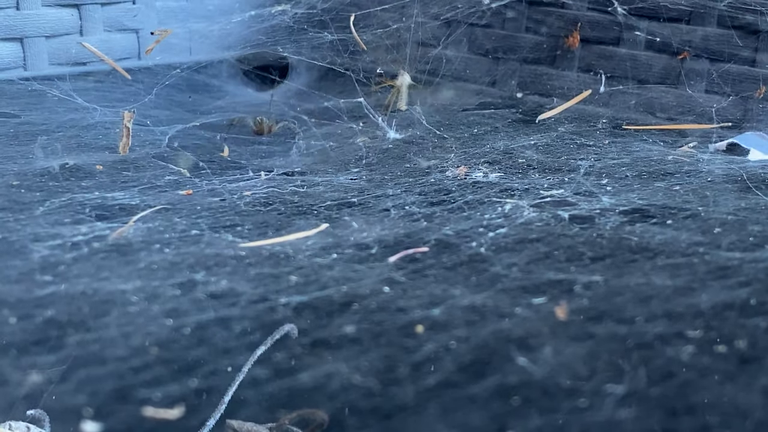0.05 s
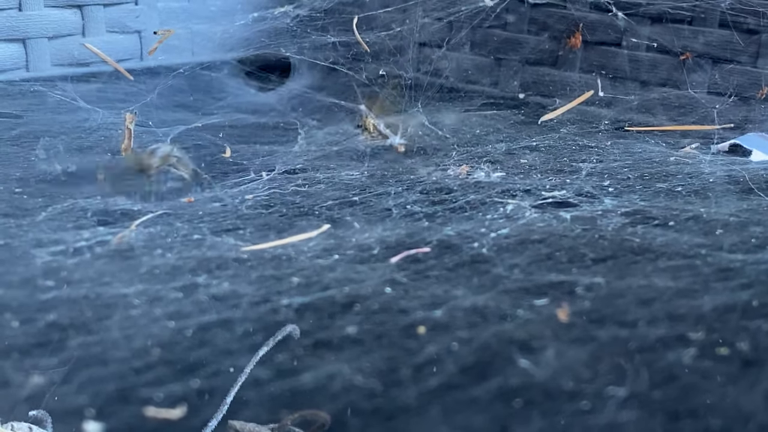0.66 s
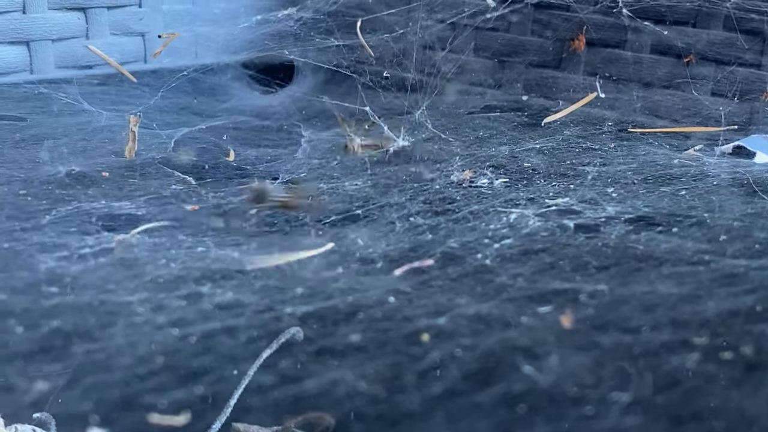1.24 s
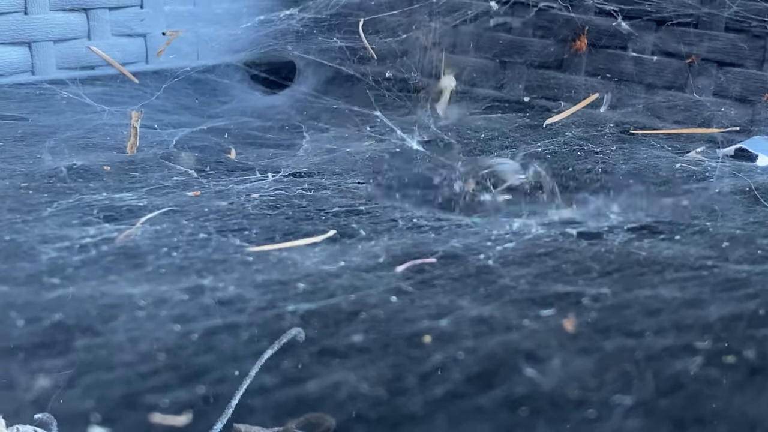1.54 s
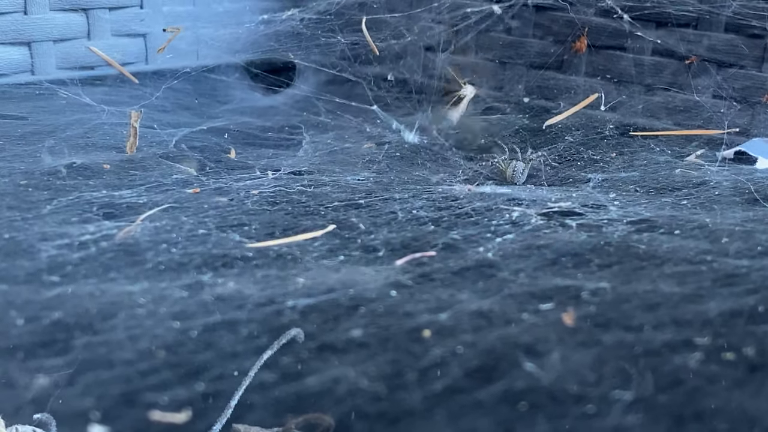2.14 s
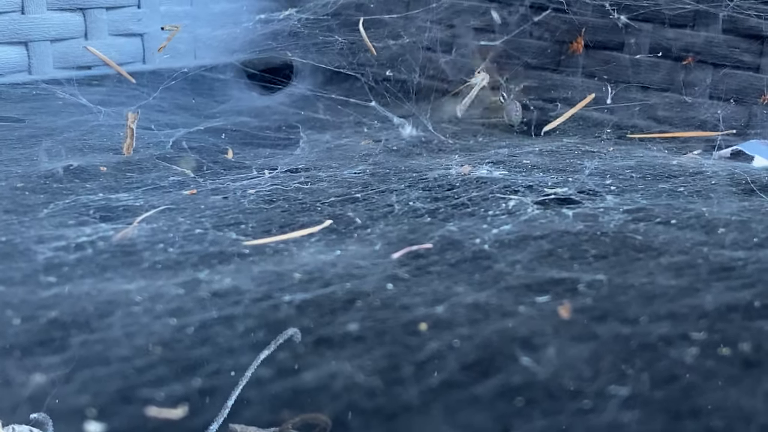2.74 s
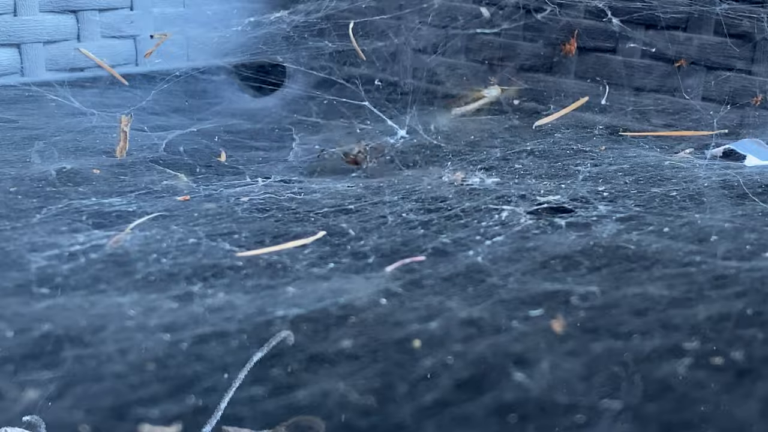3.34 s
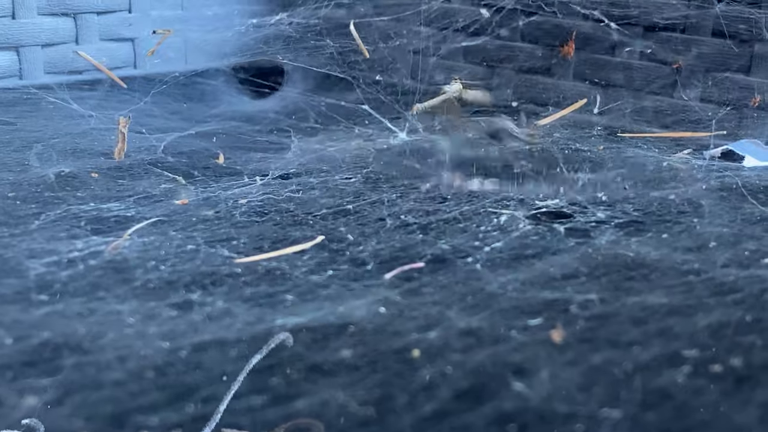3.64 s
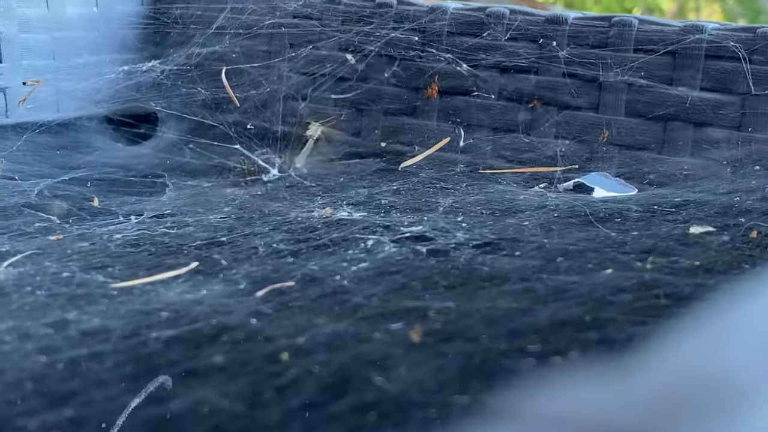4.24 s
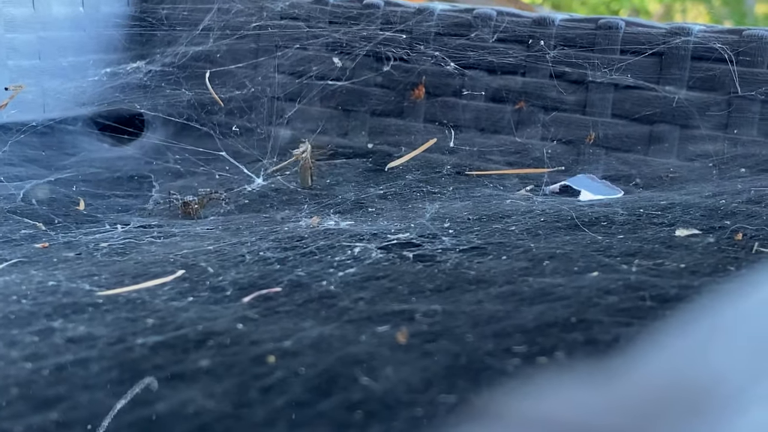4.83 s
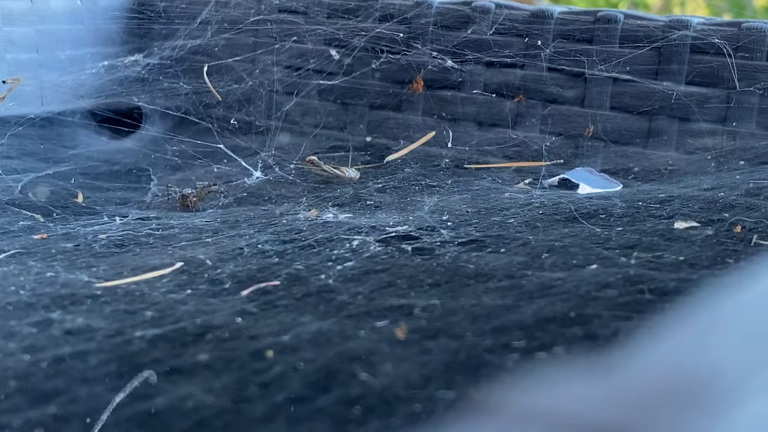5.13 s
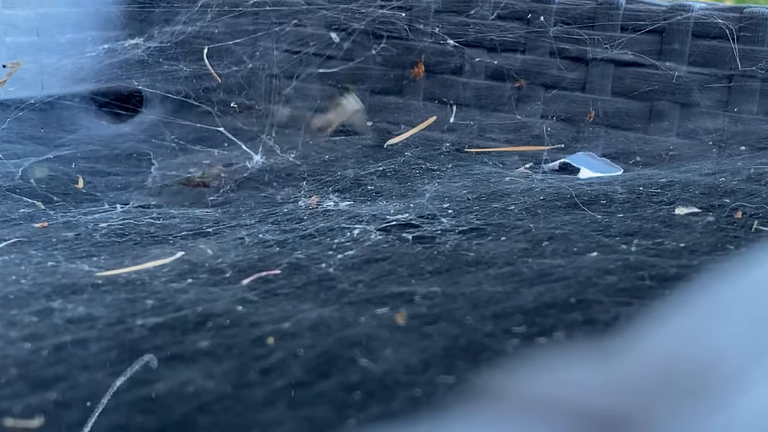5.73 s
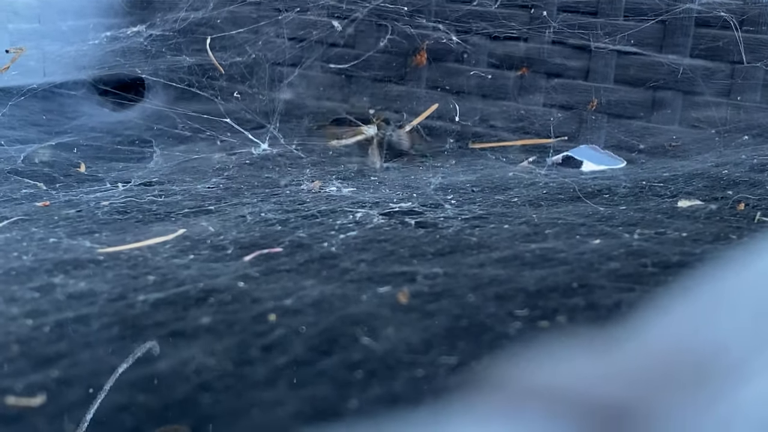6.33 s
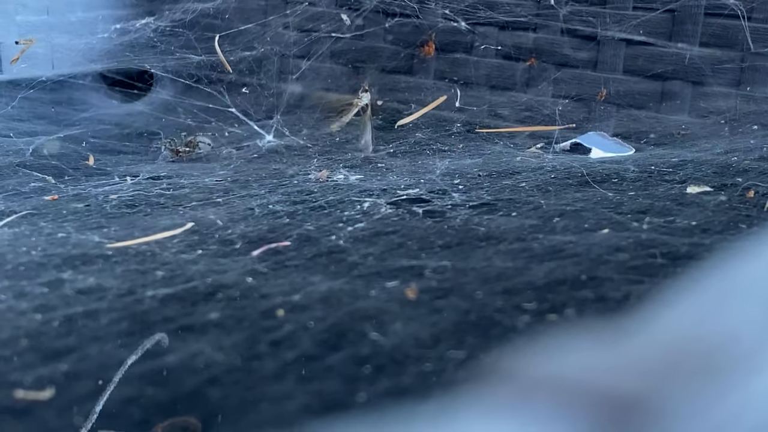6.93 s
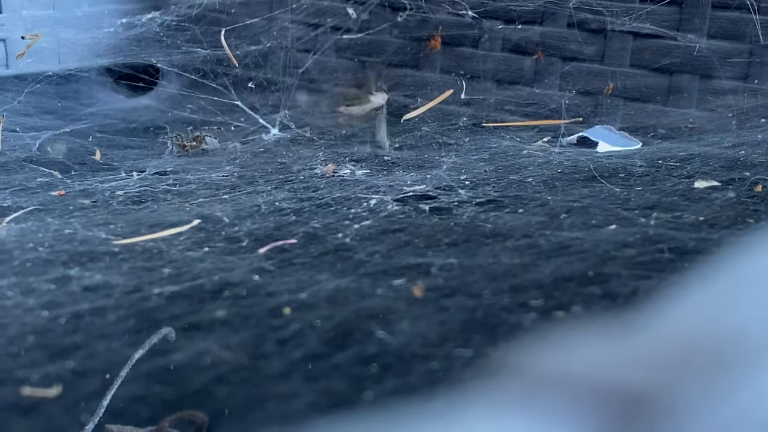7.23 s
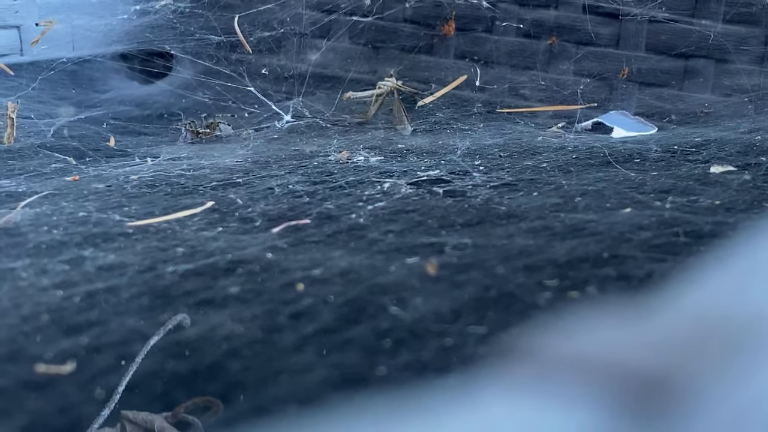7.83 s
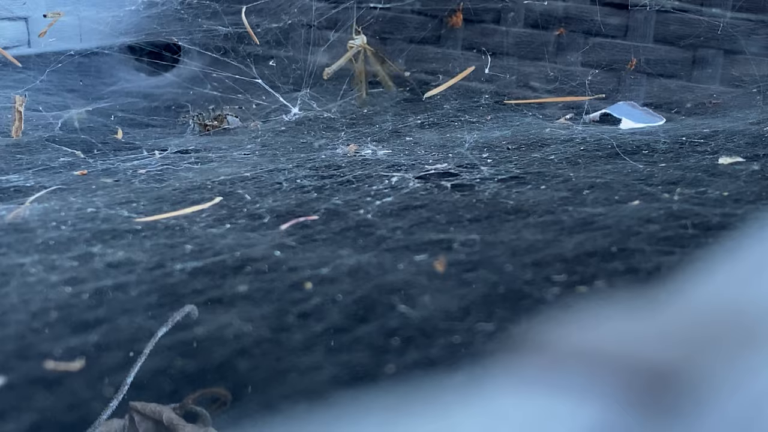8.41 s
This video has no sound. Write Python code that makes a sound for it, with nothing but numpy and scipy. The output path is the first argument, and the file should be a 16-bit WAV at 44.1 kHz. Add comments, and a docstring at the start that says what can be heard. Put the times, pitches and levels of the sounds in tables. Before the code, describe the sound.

A bird scolds outdoors, slightly to the left, in a quick run of harsh, raspy chirps. Distant traffic rumbles and a machine hums low while, close to the microphone, an insect's wings tick and flutter faintly against a spider's web. Midway a hand bumps the microphone with a scuff, a sharp knock and a brief low boom. The bird scolds again, farther off, then only the rumble and ticking remain.

```python
"""A bird scolds in harsh, quick calls, each a chirp that breaks into a two-voiced rasp.
Behind it, distant traffic roars and a machine hums low. Close by, an insect struggles in a
spider's web on a wicker seat, its wings ticking on the silk. Midway a hand jolts a camera:
a scuff, a sharp knock and a short boom from the seat. The bird then scolds again, farther off."""
import sys
import numpy as np
from scipy import signal
from scipy.fft import rfft, irfft
from scipy.io import wavfile
from scipy.ndimage import uniform_filter1d

SR = 44100
rng = np.random.default_rng(int(sys.argv[2]) if len(sys.argv) > 2 else 0)


def wrap_up_sound(samples):
    """Save the sound to the file named by the first command line argument, as 16-bit audio."""
    columns = np.atleast_2d(samples).T
    # keep every value between -1 and 1, then stretch to whole-number steps
    tamed = np.clip(columns, -1, 1)
    steps = np.round(tamed * 32767).astype(np.int16)
    wavfile.write(sys.argv[1], SR, steps)


N = 373527
TIME = np.arange(N) / SR
FREQUENCIES = np.fft.rfftfreq(N, 1 / SR)

# how alike surrounding noise is left and right (frequency [Hz], likeness [0 to 1])
STEREO_LIKENESS = [(60, .985), (150, .975), (300, .91), (550, .55), (1100, .37), (2200, .57), (3300, .92),
                   (4500, .99), (7000, .99), (12000, .85)]
# how far the left side runs ahead; scene() eases it out below 2 kHz (frequency [Hz], phase [radians])
LEFT_LEAD = [(100, -1.5), (2000, 0), (3400, -0.1), (6000, 1.27), (6700, 0.5), (7300, 0.85), (8400, 3.5),
             (9800, 3), (11100, 7.5), (13200, 5.5), (14400, 10), (15500, 9)]
# tone of the far traffic (frequency [Hz], relative level [dB])
TRAFFIC_SPECTRUM = [(25, -8), (45, 14), (78, 12.5), (110, 7), (150, -3), (220, -4.5), (420, -9.5),
                    (560, -5), (760, -5.5), (1020, 0.5), (1350, -6.5), (2000, -11), (3400, -26),
                    (5400, -38), (15000, -54)]
# loudness of the far traffic around 1 kHz (time [s], level [dB])
TRAFFIC_LEVEL = [(0, -59), (1, -58.5), (2.5, -59.5), (3.5, -60.5), (4.5, -59.5), (5.6, -60.5), (7, -60.2),
                 (8.47, -59.5)]
# tone of one nearer vehicle (frequency [Hz], relative level [dB])
VEHICLE_SPECTRUM = [(40, -16), (90, 3.5), (170, 0), (260, -8.5), (550, -14.5), (800, -12), (1200, -10),
                    (2000, -19), (4000, -30), (8000, -51)]
# that vehicle draws away (time [s], level [dB])
VEHICLE_LEVEL = [(0, -51), (.5, -53.5), (.9, -50), (1.75, -52), (2.3, -54.5), (3.1, -57.5), (3.7, -58),
                 (4.5, -63.5), (5.3, -72), (8.47, -74)]
# slow rise and fall of the machine hum (time [s], level [dB])
HUM_LEVEL = [(0, -47.5), (.9, -49), (1.08, -55), (1.58, -42.5), (1.72, -61), (1.98, -46.5), (2.6, -49),
             (3.15, -63), (3.7, -49), (4.4, -45.5), (5.4, -50.5), (6.85, -51.5), (7.15, -46.5),
             (7.4, -52.5), (8.47, -53)]
# spells of fluttering (start [s], length [s], level [dB])
FLUTTER_BOUTS = [(0, 1, -78.5), (1.14, .16, -76.5), (1.41, 0.31, -77.5), (1.9, .11, -85), (2.15, 0.44, -79),
                 (2.66, 0.19, -80), (2.908, 0.67, -74), (3.62, .46, -75.5), (4.17, .2, -78),
                 (4.378, 0.42, -71), (5.732, .09, -76.5), (6.14, .05, -85), (6.34, .12, -84),
                 (6.487, 0.38, -81.5), (7.02, .09, -73), (7.212, 0.097, -72.5), (7.35, 0.2, -76.5),
                 (7.77, .03, -85.5), (8.34, .08, -86)]
# the wings hit the web hard (time [s], level [dB])
WING_HITS = [(.8759, -54), (.938, -55), (1.2516, -52.5), (1.4601, -53.5), (1.9784, -59), (2.3255, -54.5),
             (2.355, -48.5), (2.5186, -59), (2.7327, -56), (2.913, -54), (3.54, -51), (3.7526, -51),
             (4.4164, -55.5), (4.589, -54), (4.66, -52), (5.7414, -62), (6.554, -62), (7.0559, -49),
             (7.085, -55), (7.2634, -53.5), (7.5138, -58.5)]
# tone of a wing on silk (frequency [Hz], gain [dB])
SILK_TONE = [(1500, -21), (3500, -1.5), (7000, -1.5), (9000, 2.5), (12500, 0), (14500, 3), (15600, -11)]
# tone of the hand rubbing the camera (frequency [Hz], relative level [dB])
SCUFF_SPECTRUM = [(25, -22), (55, -4.5), (105, 1), (190, -8), (290, 2), (430, -7.5), (600, -11),
                  (760, -7.5), (1100, -15), (2000, -24.5), (5000, -37.5), (11000, -32.5), (15500, -43)]
# loudness of that rub (time [s], level [dB])
SCUFF_LEVEL = [(3.7, -85), (3.755, -49), (3.78, -45), (3.796, -37.5), (3.804, -29.5), (3.82, -31.5),
               (3.834, -29.5), (3.845, -37), (3.862, -49), (3.92, -81)]
# knocks on the camera's case (time [s], relative level [dB])
KNOCKS = [(3.7865, -47), (3.8178, -36), (3.8297, -28), (3.8338, -18.5), (3.8443, -37.5), (3.851, -37.5)]
# notes the case rings with (frequency [Hz], relative level [dB], time to fade by 60 dB [s])
CASE_NOTES = [(290, -16, .06), (740, -9.5, 0.028), (1150, -19, 0.023), (2400, -4, 0.016),
              (3140, -5.5, 0.011), (4140, -8, 0.014), (7230, -17, .01), (10800, -15, 0.0078)]
# notes the seat booms with (frequency [Hz], level [dB], time to fade by 60 dB [s])
SEAT_NOTES = [(62.4, -25, .44), (82, -26.5, .31), (115.4, -29, 0.23)]
# first echoes off the ground and a wall (delay [s], gain [dB])
NEAR_ECHOES = [(.0041, -12), (0.0114, -15.5), (.047, -17.5)]
# how long the yard echoes (frequency [Hz], time to fade by 60 dB [s])
YARD_FADE = [(1000, 0.69), (3000, 0.52), (4500, .56), (7000, 0.46), (12000, 0.25)]
# share of the bird's sound that the yard sends back (time [s], gain [dB])
ECHO_SHARE = [(0, -6), (.9, -7.5), (3.9, -4), (5.2, -3)]
# the bird's calls, with levels before filtering and echoes
# (time [s], chirp level [dB], chirp pitch [Hz], delay to mid-rasp [s], rasp level [dB], hiss level [dB])
BIRD_CALLS = [ (-.07, -40, 2020, .028, -45.5, -46.5), (.084, -48, 2000, .03, -43, -41.5),
              (.247, -45.5, 2040, .022, -44.5, -45.5), (.397, -45.5, 1990, .021, -44.5, -46),
              (.545, -44, 2000, .026, -43.5, -45.5), (.697, -46, 2000, .03, -44.5, -44.5),
              (3.815, -51, 2070, 0.028, -52, -46.5), (3.972, -49.5, 2070, .032, -50, -53),
              (4.128, -48.5, 2120, 0.032, -50, -54.5), (4.277, -49.5, 2006, .031, -47.5, -51),
              (4.427, -45, 2100, 0.028, -47.5, -51.5), (4.587, -48.5, 1975, 0.025, -48.5, -50),
              (4.744, -47, 2060, .024, -48.5, -51), (4.895, -49.5, 1990, .021, -48, -52)]
# how the throat shapes the rasp (frequency [Hz], gain [dB])
THROAT_TONE = [(1000, -21), (1700, -1), (2150, 3), (2520, -4.5), (2850, 1), (3450, -2), (3750, -5),
               (4300, -10), (7000, -23)]
# tone of the breathy hiss above the rasp (frequency [Hz], gain [dB])
HISS_TONE = [(2500, -13), (3700, -2), (4500, 1.5), (4950, -2), (5400, 0.5), (6000, -4), (6900, -4),
             (7700, -7), (9500, -25), (13000, -27), (15500, -40)]
# how much louder the bird is on the left (frequency [Hz], left minus right [dB])
BIRD_BALANCE = [(1000, -1.5), (2100, 8), (3000, 4), (4400, -0.5), (8000, 0.5)]


def gain_of(db):
    """Turns decibels into a number to multiply by."""
    return 10 ** (np.asarray(db) / 20)


def evened(x):
    """Scales a signal to an average strength (rms) of 1."""
    return x / np.sqrt(np.mean(x ** 2) + 1e-20)


def by_frequency(table, hz=FREQUENCIES):
    """Reads between a table's rows on a log-frequency scale."""
    row_hz, value = np.transpose(table)
    return np.interp(np.log(hz + 1), np.log(row_hz + 1), value)


def over_time(table):
    """Reads between a table's rows at every sample."""
    return np.interp(TIME, *np.transpose(table))


def filtered(x, response):
    """Multiplies each frequency in x by its own factor."""
    return irfft(rfft(x) * response, N)


def shaped(x, tone):
    """Filters x with a table of decibels."""
    return filtered(x, gain_of(by_frequency(tone)))


def drift(rate_hz):
    """A smooth random wobble of strength 1."""
    return evened(filtered(rng.standard_normal(N), np.exp(-(FREQUENCIES / rate_hz) ** 2)))


def add(mix, start_s, sound):
    """Lays a sound into the mix."""
    part = mix[max(round(start_s * SR), 0):][:len(sound)]
    part += sound[:len(part)]


def resonate(x, hz, width_hz):
    """Makes x ring at a moving pitch."""
    turn = np.exp(2j * np.pi * np.cumsum(hz) / SR)
    feedback = np.exp(-np.pi * width_hz / SR)
    return 2 * (turn * signal.lfilter([1 - feedback], [1, -feedback], x / turn)).real


def surrounding_noise(spectrum):
    """Noise from all around: left and right differ most in the middle pitches."""
    common, apart = rng.standard_normal((2, N))
    likeness = np.clip(by_frequency(STEREO_LIKENESS), 0, .999)
    side = filtered(apart, np.sqrt((1 - likeness) / (1 + likeness)))
    return evened(shaped(np.array([common + side, common - side]), spectrum))


def far_traffic():
    """Distant tyres blend into a steady roar."""
    roar = surrounding_noise(TRAFFIC_SPECTRUM)
    tyre_band = filtered(roar.mean(0), (FREQUENCIES > 850) & (FREQUENCIES < 1300))
    return roar / np.std(tyre_band) * gain_of(over_time(TRAFFIC_LEVEL) + .5 * drift(16))


def passing_vehicle(drone_hz=543, width_hz=144, peak_s=1.79, swell_s=.36, swell_db=12):
    """A nearer vehicle: its drone swells once as it goes by, then it fades away."""
    rumble = surrounding_noise(VEHICLE_SPECTRUM)
    drone = filtered(rumble, np.exp(-((FREQUENCIES - drone_hz) / width_hz) ** 2))
    swell = np.exp(-((TIME - peak_s) / swell_s) ** 2)
    rumble += drone * (gain_of(swell_db * swell) - 1)
    return rumble * gain_of(over_time(VEHICLE_LEVEL) + 1.3 * drift(15))


def machine_hum(pitch_hz=60.65, wander_hz=1.995, throb_hz=9):
    """A distant machine wavers and throbs, with a faint tone near three times its pitch."""
    phase = 2 * np.pi * np.cumsum(pitch_hz + wander_hz * drift(9.03)) / SR
    throb = 1 + .39 * (drift(throb_hz) + 1j * drift(throb_hz))
    drone = evened((throb * np.exp(1j * phase)).real) * gain_of(over_time(HUM_LEVEL))
    overtone = gain_of(-70.5) * np.sin(2 * np.pi * np.cumsum(179 + 1.526 * drift(3.05)) / SR)
    return (drone + overtone) * gain_of([[-.5], [.5]])  # a little to the right


def wing_effort(fade_s=.02, waver_hz=7):
    """How hard the insect beats its wings: each bout rises, wavers and dies away."""
    level = np.zeros(N)
    for start, length, db in FLUTTER_BOUTS:
        outside_s = np.maximum(start - TIME, TIME - start - length)
        level = np.maximum(level, gain_of(db) * np.exp(-np.clip(outside_s / fade_s, 0, 20)))
    return level * gain_of(drift(waver_hz))


def insect_wings(beat_hz=72):
    """Each wingbeat ticks on the silk: a faint flutter, and three fading ticks for a hard hit."""
    beat_count = np.cumsum(beat_hz * (1 + .073 * drift(7.2))) / SR
    strength = gain_of(3.2 * np.minimum(rng.standard_normal(N), 2))[beat_count.astype(int)]  # one a beat
    flutter = evened(.4 + strength * np.exp(-(beat_count % 1) / .12)) * wing_effort()
    t = np.arange(SR // 60) / SR
    tick = np.exp(-t / .00072) + .2 * np.exp(-t / .0064)
    hits = np.zeros(N)
    for start, db in WING_HITS:
        for beat, chance in enumerate(rng.standard_normal(3)):
            tick_s = start + beat / beat_hz * (1 + .045 * chance)
            add(hits, tick_s, gain_of(db - 5.5 * beat + 1.6 * chance) * tick)
    return shaped(np.hypot(flutter, hits) * rng.standard_normal(N), SILK_TONE)


def hand_scuff():
    """A hand rubs the camera, making a short burst of rough noise."""
    rub = evened(surrounding_noise(SCUFF_SPECTRUM) * gain_of(2.3 * drift(200)))
    touching = (TIME > SCUFF_LEVEL[0][0]) & (TIME < SCUFF_LEVEL[-1][0])
    return rub * gain_of(over_time(SCUFF_LEVEL)) * touching


def case_knocks():
    """Each knock gives a sharp crack and sets the camera's case ringing."""
    t = np.arange(SR // 3) / SR
    knocks = np.zeros((2, N))
    for start, db in KNOCKS:
        ring = sum(gain_of(level - 60 * t / fade_s) * np.sin(2 * np.pi * (hz * t + rng.random()))
                   for hz, level, fade_s in CASE_NOTES)
        for side in knocks:
            crack = rng.standard_normal(len(t)) * (np.exp(-t / .0007) + .11 * np.exp(-t / .0086))
            add(side, start, gain_of(db) * (gain_of(-4.5) * ring + gain_of(-7.5) * crack))
    return knocks


def seat_boom(start_s=3.825, rise_s=.021):
    """The jolt makes the seat ring briefly with three deep notes."""
    t = np.arange(SR // 3) / SR
    ring = sum(gain_of(db - 60 * t / fade_s) * np.sin(2 * np.pi * hz * t) for hz, db, fade_s in SEAT_NOTES)
    boom = np.zeros(N)
    add(boom, start_s, ring * (1 - np.exp(-t / rise_s)))
    return boom


def yard_echo(x, echoes_per_s=2500, build_s=.0063):
    """Walls and trees scatter many small echoes; the highest pitches die first."""
    echoes = rng.standard_normal((2, SR)) * (rng.random((2, SR)) < echoes_per_s / SR)
    echoes[1] = .91 * echoes[0] + .5 * echoes[1]  # the right side is much like the left
    hz, t, bands = signal.stft(echoes, SR, nperseg=256)
    build_up = 1 - np.exp(-t / build_s)
    fade = gain_of(-60 * t / by_frequency(YARD_FADE, hz)[:, None])
    tail = signal.istft(bands * build_up * fade, SR, nperseg=256)[1]
    return signal.fftconvolve(x[None], tail / np.linalg.norm(tail[0]), axes=1)[:, :N]


def bird_chirp(t, pitch_hz, shudder, air):
    """A breathy whistle that arches up and down in pitch, loudest at t = 0."""
    arch_hz = pitch_hz * np.maximum(1.01 - .0597 * (t / .01305) ** 2, .87) * (1 + .046 * shudder)
    swell = np.exp(-(t / .0088) ** 2) + .32 * np.exp(-((t - .024) / .016) ** 2)
    whistle = np.sin(2 * np.pi * np.cumsum(arch_hz) / SR) * swell
    breath = evened(resonate(air, arch_hz, 350)) * np.exp(-((t - .004) / .018) ** 2)
    return whistle + .264 * breath


def bird_call(chirp_db, chirp_hz, delay_s, rasp_db, hiss_db, lead_s):
    """One call in three parts: a chirp, a rasp that climbs as the beak opens, and a hiss on top."""
    t = np.arange(SR // 6) / SR - lead_s
    puffs, air, *shakes = rng.standard_normal((5, len(t)))
    low_shake, high_shake, shudder = (evened(uniform_filter1d(shake, 50)) for shake in shakes)
    chirp = bird_chirp(t, chirp_hz, shudder, air)
    opening = np.clip(t / (2 * delay_s), 0, 1)
    roughness = np.clip(.2 + 1.22 * opening, 0, .75)
    # the two sides of the bird's voice box sound at their own unsteady pitches
    low_climb_hz, high_climb_hz = 450 * rng.uniform(.599, 1.4, 2)
    low_hz = (2800 + low_climb_hz * opening) * (1 + .06 * roughness * low_shake)
    high_hz = (3220 + high_climb_hz * opening) * (1 + .048 * roughness * high_shake)
    low_phase, high_phase = 2 * np.pi * np.cumsum([low_hz, high_hz], axis=1) / SR
    high_entry = np.clip(opening * 2.9, 0, 1)
    voices = evened(np.sin(low_phase) + 1.24 * high_entry * np.sin(high_phase))
    centre_hz = (low_hz + high_entry * high_hz) / (1 + high_entry)
    rasp = evened(voices + 1.4 * roughness * evened(resonate(puffs, centre_hz, 900)))
    rasp *= np.exp(-np.abs((t - delay_s) / .025) ** 3)
    # each voice is 3 times a pitch near 1 kHz; the overtones are 4 to 7 times that pitch
    overtones = evened(sum(np.sin(k * low_phase / 3) + np.sin(k * high_phase / 3) for k in range(4, 8)))
    overtones *= np.exp(-np.abs((t - .95 * delay_s) / .026) ** 3)  # they peak just before the breath
    breath = (.073 + .76 * roughness) * air * np.exp(-np.abs((t - delay_s - .003) / .025) ** 2.8)
    hiss = (.44 * overtones + breath) * gain_of(1.6 * shudder)
    return gain_of(chirp_db) * chirp, gain_of(rasp_db) * rasp, gain_of(hiss_db) * hiss


def scolding_bird(lead_s=.03):
    """Two bouts of calls; the second is farther off, so it is softer and has more echo."""
    head_start = SR // 4  # samples of room for the call already under way at time 0
    parts = np.zeros((3, N))
    for chirp_s, *shape in BIRD_CALLS:
        for part, sound in zip(parts, bird_call(*shape, lead_s)):
            add(part, chirp_s - lead_s + head_start / SR, sound)
    chirp, rasp, hiss = parts
    voice = chirp + shaped(rasp, THROAT_TONE) + shaped(hiss, HISS_TONE)
    bounces = sum(gain_of(db) * np.exp(-2j * np.pi * FREQUENCIES * delay) for delay, db in NEAR_ECHOES)
    echo_share = gain_of(over_time(ECHO_SHARE))
    near = filtered(voice, 1.08 + bounces) / np.sqrt(1 + .5 * echo_share ** 2)
    heard = near + yard_echo((near - .32 * chirp) * echo_share)  # the chirp echoes less
    heard = np.pad(heard[:, head_start:], ((0, 0), (0, head_start)))
    lean_db = by_frequency(BIRD_BALANCE) / 2
    return filtered(heard, gain_of([lean_db, -lean_db]))


def scene():
    """Adds up all the sources and puts left and right out of step in the treble."""
    mix = scolding_bird() + far_traffic() + passing_vehicle() + machine_hum() + insect_wings()
    mix += hand_scuff() + case_knocks() + seat_boom()
    treble = np.clip(FREQUENCIES / 2000, 0, 1) ** 2
    half_lead = treble * by_frequency(LEFT_LEAD) / 2
    return filtered(mix, np.exp(1j * np.array([half_lead, -half_lead])))


def record(dry):
    """Cuts away the very highest treble."""
    low_pass = signal.firwin(511, cutoff=15650, window=("kaiser", 9), fs=SR)
    return signal.oaconvolve(dry, low_pass[None], "same")


dry = scene()
out = record(dry)
wrap_up_sound(out)
```